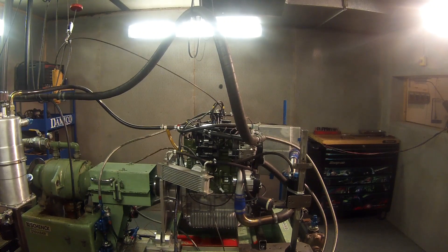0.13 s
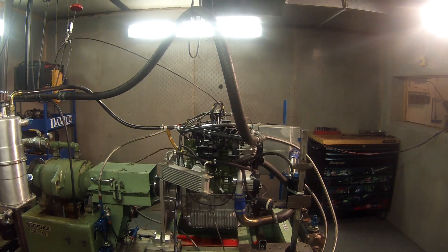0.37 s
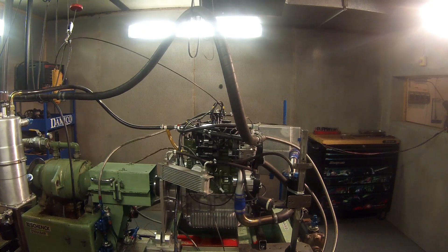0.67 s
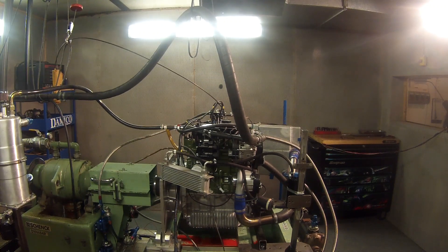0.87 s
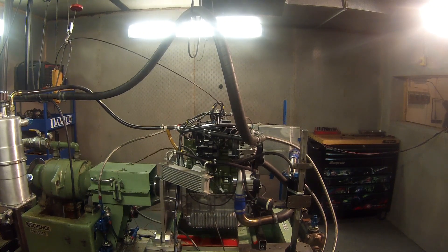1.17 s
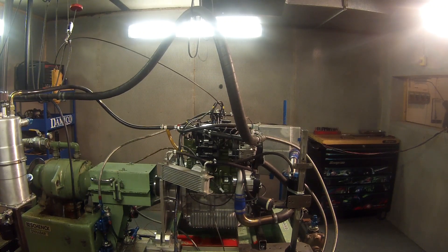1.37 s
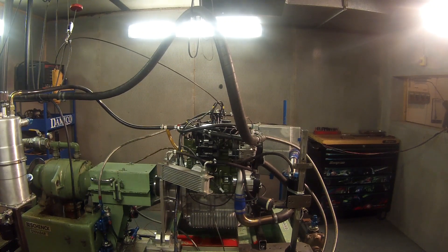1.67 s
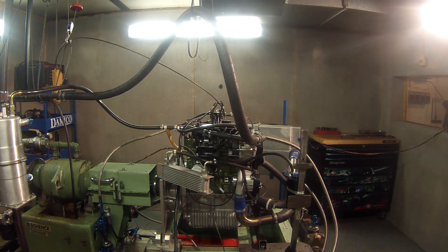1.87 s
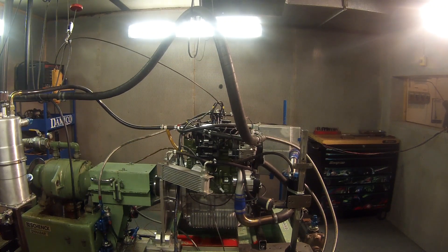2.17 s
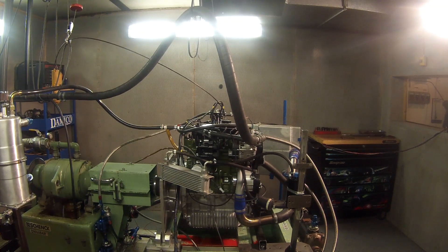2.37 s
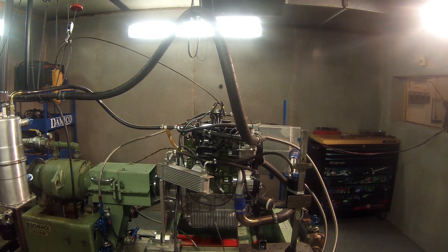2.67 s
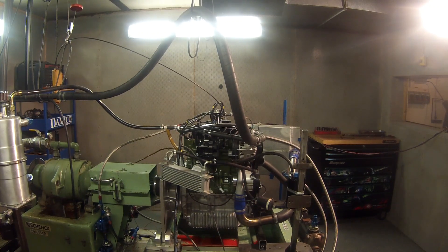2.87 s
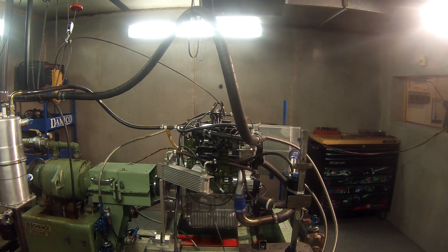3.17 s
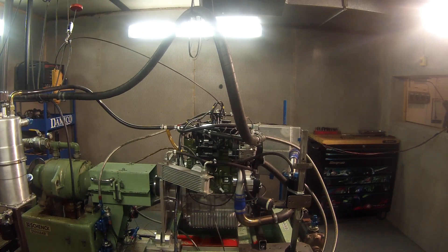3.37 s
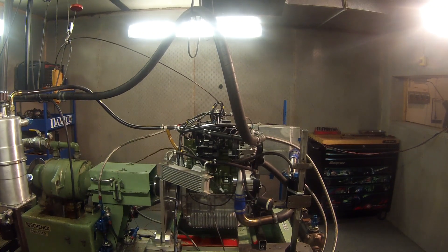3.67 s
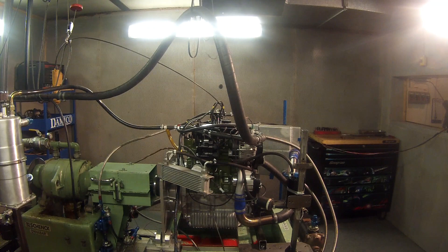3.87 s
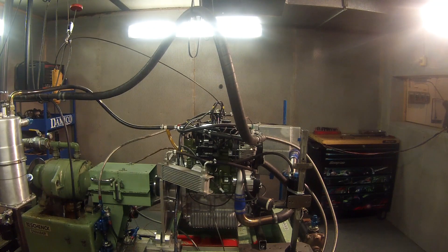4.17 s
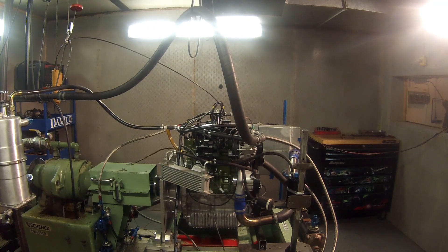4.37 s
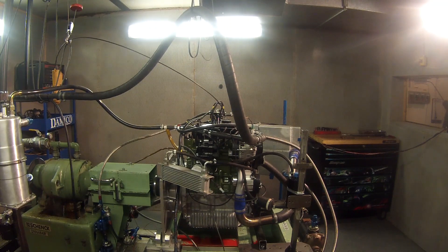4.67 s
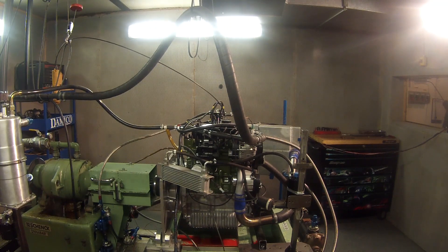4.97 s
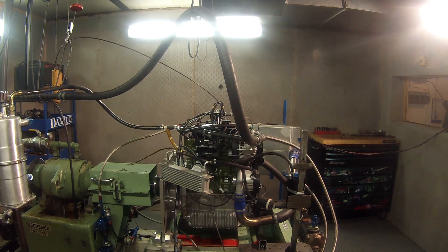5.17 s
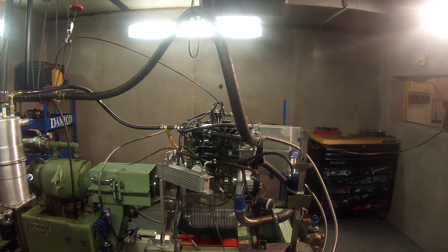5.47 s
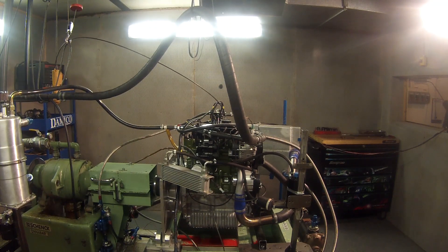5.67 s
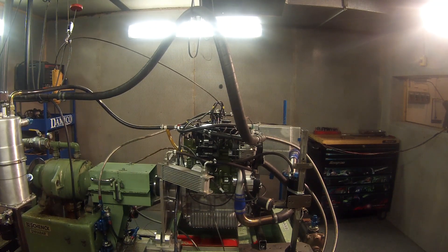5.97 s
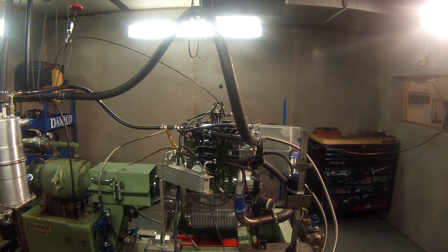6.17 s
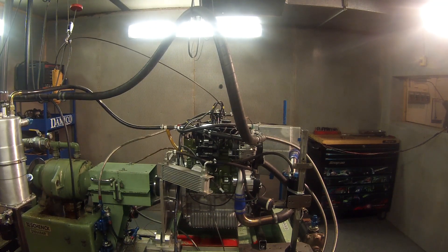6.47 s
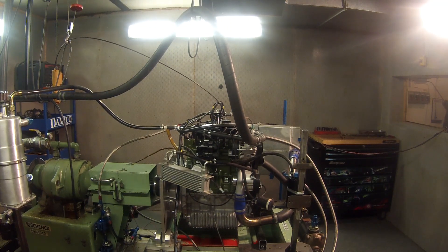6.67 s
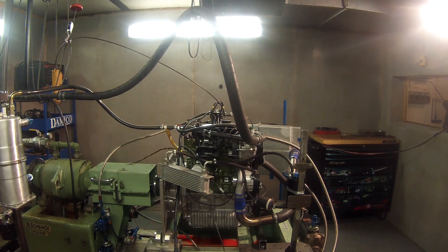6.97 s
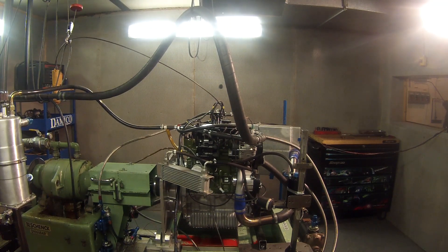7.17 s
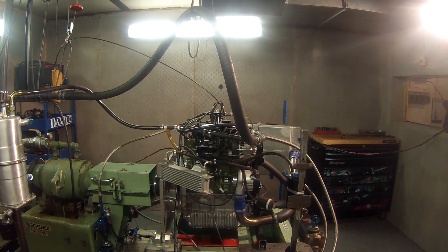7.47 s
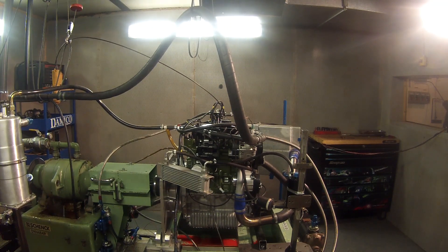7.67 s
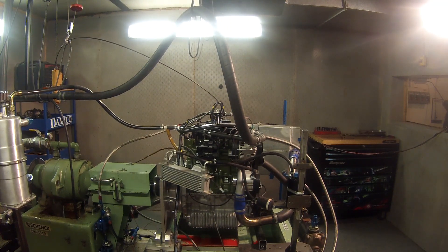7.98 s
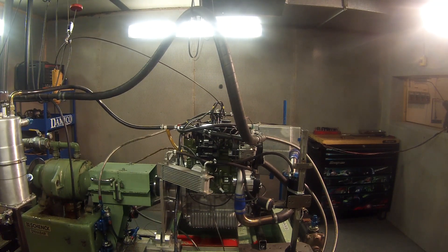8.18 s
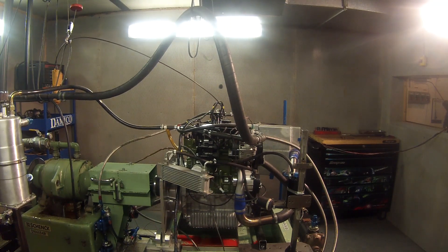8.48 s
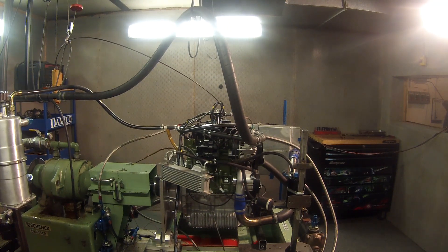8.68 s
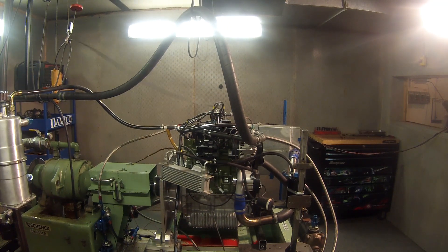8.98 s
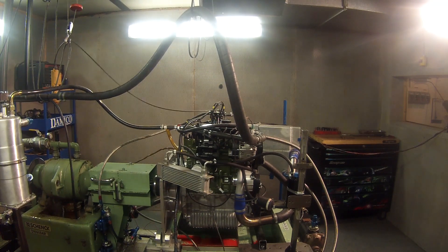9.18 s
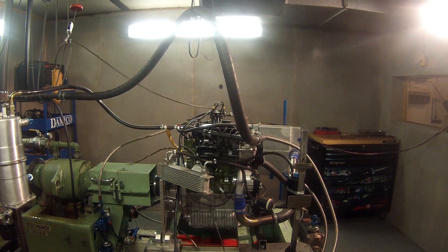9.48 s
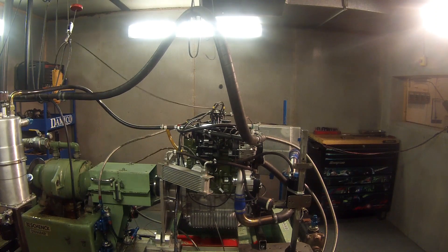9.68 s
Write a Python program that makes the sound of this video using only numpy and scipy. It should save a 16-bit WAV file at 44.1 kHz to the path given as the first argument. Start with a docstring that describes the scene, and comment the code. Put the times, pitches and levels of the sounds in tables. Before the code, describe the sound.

An engine drones and clatters at steady high revs under a thin supercharger whine, then drops off with rapid air chuffs and exhaust burble.

```python
"""Supercharged four-cylinder on a dyno.

The engine is held near 6000 rpm under full load in a small concrete cell. The exhaust drones, the
metal clatters in a pattern that repeats once a cycle, and the supercharger hisses and whines.
Then the throttle shuts: the revs sink, the exhaust burbles and booms, and the blocked compressor
surges in quick chuffs."""
import sys
import numpy as np
from scipy import signal
from scipy.fft import rfft, irfft, next_fast_len
from scipy.io import wavfile
from scipy.ndimage import uniform_filter1d

SR = 44100
rng = np.random.default_rng(int(sys.argv[2]) if len(sys.argv) > 2 else 0)


def wrap_up_sound(samples):
    """Save the sound to the file named by the first command line argument, as 16-bit audio."""
    columns = np.atleast_2d(samples).T
    # keep every value between -1 and 1, then stretch to whole-number steps
    tamed = np.clip(columns, -1, 1)
    steps = np.round(tamed * 32767).astype(np.int16)
    wavfile.write(sys.argv[1], SR, steps)


N = 433923
TIME_S = np.arange(N) / SR
HELD_CYCLE_HZ = 49.865  # four-stroke cycles, two revolutions each
SHUT_S, CLOSING_S = 8.955, 0.18  # throttle

# Gas rumble in the exhaust. Each row: frequency in Hz, relative density in dB.
RUMBLE_SPECTRUM = [(20, -29), (46, -4), (100, -5), (170, -0.5), (210, -2), (320, -20), (420, -18),
                   (700, -14), (1500, -32)]


def exhaust(cycles, waver_db=0.32, lowest_db=-2, lowest_waver_db=4):
    """Loaded exhaust: harmonics of the cycle rate, with one pressure pulse per cylinder."""
    # Exhaust lines. Each row: multiple of the cycle rate, level in dB.
    lines = [(1, -53.5), (2, -48.2), (3, -49.0), (4, -23.3), (5, -51.2), (6, -45.3), (7, -58.0), (8, -36.2),
             (9, -49.8), (10, -44.7), (11, -59.6), (12, -35.1), (13, -52.1), (14, -45.6), (15, -54.8),
             (16, -47.3), (17, -56.4), (18, -36.3), (19, -48.8), (20, -46.3), (21, -62.4), (22, -58.3),
             (23, -47.3), (24, -50.9)]
    drone = 0
    for order, db in lines:
        phase = np.pi if order in (4, 8, 12) else 2 * np.pi * rng.random()  # these align into pulses
        if order == 1:
            db = db + lowest_db + lowest_waver_db * drift(3)
        drone = drone + from_db(db) * np.cos(2 * np.pi * order * cycles + phase)
    return np.sqrt(2) * drone * from_db(waver_db * drift(4.7))


def clatter(cycles, gain_db=0.22, shifting_db=-12.5, shift_hz=4, jitter_s=8e-6):
    """Block, head and valves knock alike each cycle; the pattern shifts while its power holds."""
    # Envelope of the clatter's lines. Each row: frequency in Hz, level in dB.
    envelope = [(1200, -59), (1350, -41.5), (1450, -55), (1600, -46.5), (1800, -42), (2200, -50.5),
                (2800, -45.5), (3250, -41.5), (3700, -39), (4400, -48), (5300, -49), (6200, -53.5),
                (6900, -43.5), (7450, -43.5), (7800, -80), (9000, -60)]
    # Lines that ring out. Each row: multiple of the cycle rate, level in dB.
    ringing = [(30, -39.4), (38, -38.9), (41, -35.3), (42, -35.0), (43, -31.2), (46, -36.2), (47, -35.9),
               (50, -37.0), (53, -39.3), (62, -36.9), (70, -34.0), (71, -31.9), (73, -24.6), (74, -30.5),
               (75, -27.6), (76, -30.1), (78, -34.0), (80, -30.0), (85, -34.0), (86, -35.8), (98, -35.5),
               (99, -35.1), (103, -33.5), (114, -37.2), (115, -35.9), (117, -38.6), (118, -37.4),
               (131, -35.1), (139, -38.5), (148, -39.6)]
    orders = np.arange(25, 181)
    line_db = spectrum_db(envelope, orders * HELD_CYCLE_HZ) + rng.uniform(-4, 4, len(orders))
    for order, db in ringing:
        line_db[orders == order] = db
    cycles = cycles + jitter_s * HELD_CYCLE_HZ * drift(15)
    out = 0
    for band in np.split(np.arange(len(orders)), [32, 64]):  # low, mid, high: a pattern each
        gains = from_db(line_db[band])
        knock = knock_pattern(cycles, orders[band], gains, decay=1.32, passes=3)
        for _ in range(3):
            blend = from_db(shifting_db) * drift(shift_hz)
            knock += blend * knock_pattern(cycles, orders[band], gains, decay=3.3, passes=1)
        running_power = uniform_filter1d(knock ** 2, SR // 10)
        out = out + knock * np.sqrt(np.sum(gains ** 2) / running_power)
    return from_db(gain_db) * out


def knock_pattern(cycles, orders, gains, decay, passes, size=4096):
    """Four knocks with the given line gains, repeated in step with the camshaft."""
    grid = np.arange(size) / size
    pattern = np.exp(2j * np.pi * rng.random(size))
    for _ in range(passes):  # impose the firing rhythm, then the line gains
        pulsed = np.fft.fft(pattern / abs(pattern) * firing_gate(grid, decay))[orders]
        lines = np.zeros(size, complex)
        lines[orders] = gains * pulsed / abs(pulsed)
        pattern = np.fft.ifft(lines) * size
    return np.interp(cycles % 1, grid, np.sqrt(2) * pattern.real)


def rattle(cycles, cycle_hz, unloaded_db=-9, speed_power=2.6):
    """No two firings are alike: each throws noise into the castings."""
    # Casting noise. Each row: frequency in Hz, density in dB.
    spectrum = [(20, -90), (50, -104), (170, -72), (300, -82), (600, -78.5), (1100, -77), (1500, -77.5),
                (2000, -62), (2450, -81), (3200, -66), (4100, -57.5), (5200, -62), (7200, -65.5),
                (9000, -79)]
    # Casting resonances. Each row: centre in Hz, width in Hz, lift in dB.
    modes = [(2295, 72, 13), (3690, 70, 11)]
    drive = from_db(unloaded_db * closure()) * (cycle_hz / HELD_CYCLE_HZ) ** speed_power
    return drive * noise(spectrum, modes) * firing_gate(cycles, decay=0.17)


def hiss(cycles, cycle_hz, gain_db=-1.2, shut_db=-4.5, speed_power=2.5, flutter_db=0.3, flutter_hz=12.2):
    """Compressor air, gulped by the cylinders and fluttering on the edge of surge."""
    # Airflow noise. Each row: frequency in Hz, density in dB.
    spectrum = [(300, -75.5), (1100, -80), (1700, -68), (2400, -69.5), (3100, -67), (3600, -62),
                (6500, -59.5), (7700, -64), (8400, -61), (9100, -65.5), (10700, -62.5), (11800, -74),
                (12500, -69), (14000, -84.5)]
    # Charge pipe resonances. Each row: centre in Hz, width in Hz, lift in dB.
    modes = [(2150, 63, 15.4), (3550, 260, 5.9), (4060, 56, 2), (4870, 49, 7.8), (5520, 83, 3.1),
             (7020, 67, 1), (11100, 320, 1.33)]
    flutter = np.sin(2 * np.pi * flutter_hz * TIME_S + 1.1 * drift(0.74))
    flow_db = gain_db + shut_db * closure() + flutter_db * flutter
    flow = (cycle_hz / HELD_CYCLE_HZ) ** speed_power * from_db(flow_db)
    return noise(spectrum, modes) * firing_gate(cycles, decay=0.17) * flow


def whine(cycle_hz, blades_per_cycle=200.36, level_db=-32.5, flicker_db=2, stall_db_per_s=240):
    """Impeller blade tone: follows the revs, wavers with the belt, fades as the flow stalls."""
    wander_hz = 7 * drift(15.7)
    phase = 2 * np.pi * np.cumsum(blades_per_cycle * cycle_hz + wander_hz) / SR
    db = level_db - stall_db_per_s * since_shut_s(lead_s=0.008) + flicker_db * drift(22)
    return np.sqrt(2) * np.sin(phase) * from_db(db)


def surge(gain_db=0.5, rise_s=0.014, hold_s=0.027, low_t60_s=0.44, high_t60_s=0.16, split_hz=6000):
    """Trapped boost blows back through the compressor in chuffs; their treble dies first in the cell."""
    # Chuffs. Each row: start in seconds, relative level in dB.
    chuffs = [(9.01, 2.5), (9.099, 2), (9.187, 0.5), (9.273, 1), (9.357, .5), (9.438, 0), (9.52, 1.5),
              (9.601, 0), (9.68, -1), (9.756, 0.5)]
    # Backflow noise. Each row: frequency in Hz, density in dB.
    spectrum = [(300, -69.5), (1100, -75), (1600, -62.5), (2500, -61), (3100, -66.5), (3600, -61),
                (6500, -58), (7600, -65), (8300, -60), (9200, -67), (10700, -62.5), (11800, -72),
                (12500, -71), (15000, -74)]
    # Charge pipe ringing. Each row: centre in Hz, width in Hz, lift in dB.
    modes = [(2100, 130, 8), (3720, 150, 11), (4270, 80, 10), (4900, 110, 11), (5830, 90, 8),
             (6450, 100, 7), (8680, 150, 12), (10850, 400, 7.5)]
    air = noise(spectrum, modes)
    low = signal.sosfiltfilt(signal.butter(2, split_hz, fs=SR, output="sos"), air)
    out = 0
    for band, t60_s in ((low, low_t60_s), (air - low, high_t60_s)):
        power = np.zeros(N)
        for start_s, db in chuffs:
            age_s = TIME_S - start_s
            fall_db = 60 * np.maximum(age_s - hold_s, 0) / t60_s
            power += (np.clip(age_s / rise_s, 0, 1) * from_db(db - fall_db)) ** 2
        out = out + band * np.sqrt(power)
    return from_db(gain_db) * out


def overrun(cycles, cycle_hz, first_db=-46, last_db=-27, waver_db=2.5, stumble_s=0.00021):
    """The unloaded exhaust fires unevenly, grows as the revs sink and sweeps through resonances."""
    # Firing harmonics 1-5. Each row: relative level in dB at held speed, at final speed.
    partials = [(1.5, -1.5), (-4, -20), (-16, -28), (-28, -23), (-14, -23)]
    # Standing waves. Each row: centre in Hz, width in Hz, lift in dB (negative: a null).
    standing_waves = [(125, 8, 2), (154, 7, -9), (171, 16, 11.5), (250, 20, 14.5), (397, 38, 15),
                      (505, 30, 8.5)]
    firing_hz = 4 * cycle_hz
    firings = 4 * cycles + firing_hz * stumble_s * drift(9)
    slowed = (HELD_CYCLE_HZ - cycle_hz) / (HELD_CYCLE_HZ - cycle_hz[-1])
    drone_db = first_db + (last_db - first_db) * slowed
    drone = 0
    for k, (held_db, final_db) in enumerate(partials, 1):
        db = drone_db + held_db + (final_db - held_db) * slowed
        db += resonance_db(standing_waves, k * firing_hz) + waver_db * drift(14)
        drone = drone + from_db(db) * np.sin(2 * np.pi * k * firings)
    return np.sqrt(2) * drone * closure()


def afterfire(half_width_s=0.038):
    """Unburnt fuel flares in the exhaust in soft, low puffs."""
    # Puffs. Each row: peak time in seconds, level in dB.
    puffs = [(9.06, -33), (9.565, -27.5)]
    # Resonances they excite. Each row: centre in Hz, width in Hz, lift in dB.
    modes = [(76, 18, 9), (125, 25, 11), (250, 35, 15), (380, 40, 8)]
    envelope = sum(from_db(db) * np.exp(-((TIME_S - peak_s) / half_width_s) ** 2) for peak_s, db in puffs)
    flame = noise(RUMBLE_SPECTRUM, modes)
    return envelope * flame / flame.std()


def boom(mode_hz=46, loaded_db=-66, shut_db=-32, build_s=0.27):
    """The exhaust pipe's lowest mode builds up once the throttle shuts."""
    db = shut_db + (loaded_db - shut_db) * np.exp(-since_shut_s() / build_s)
    phase = 2 * np.pi * mode_hz * TIME_S + 1.6 * drift(3.3)
    return np.sqrt(2) * np.sin(phase) * from_db(db + drift(4))


def burble(loaded_db=-70, shut_db=-38):
    """Gas rumbles in the exhaust once the load is gone."""
    # Pipe and cell resonances. Each row: centre in Hz, width in Hz, lift in dB.
    modes = [(76, 12, 9), (171.3, 16, 13.3), (250, 16, 11), (395, 39, 18), (508, 25, 6), (585, 22, 7)]
    rumble = noise(RUMBLE_SPECTRUM, modes)
    return from_db(loaded_db + (shut_db - loaded_db) * closure()) * rumble / rumble.std()


def cycle_rate_hz(overshoot_hz=0.33, settle_s=0.25, hunt_hz=0.022, coast_per_s=0.555):
    """The revs settle, hunt a little against the brake, then coast down."""
    held_hz = HELD_CYCLE_HZ + overshoot_hz * np.exp(-TIME_S / settle_s) + hunt_hz * drift(3)
    return held_hz * np.exp(-coast_per_s * since_shut_s())


def firing_gate(cycles, decay):
    """Four pulses a cycle, each falling by `decay` nepers; mean square 1."""
    gate = np.exp(-decay * (4 * cycles % 1))
    return gate / np.sqrt(np.mean(gate ** 2))


def since_shut_s(lead_s=0):
    """Time since lead_s before the throttle starts to shut; zero until then."""
    return np.maximum(TIME_S - SHUT_S + lead_s, 0)


def closure():
    """Throttle from 0 (open) to 1 (shut): slow, then fast."""
    return np.minimum(since_shut_s() / CLOSING_S, 1) ** 2


def noise(spectrum, modes):
    """Noise with the given density, lifted at each resonance."""
    size = next_fast_len(N)
    hz = np.maximum(np.arange(size // 2 + 1) * SR / size, 1)
    gain = from_db(spectrum_db(spectrum, hz) + resonance_db(modes, hz))
    return irfft(rfft(rng.standard_normal(size)) * gain)[:N] * np.sqrt(SR / 2)


def spectrum_db(points, hz):
    """A spectrum interpolated over log frequency."""
    point_hz, db = np.transpose(points)
    return np.interp(np.log(hz), np.log(point_hz), db)


def resonance_db(modes, hz):
    """Summed lift of bell-shaped resonances."""
    return sum(db / (1 + (2 * (hz - centre_hz) / width_hz) ** 2) for centre_hz, width_hz, db in modes)


def drift(rate_hz):
    """Smooth random motion, standard deviation 1."""
    hop, warmup = 100, 2000
    pole = np.exp(-2 * np.pi * rate_hz * hop / SR)
    white = rng.standard_normal(N // hop + warmup + 2)
    slow = signal.lfilter([1], [1, -2 * pole, pole * pole], white)[warmup:]
    return np.interp(np.arange(N) / hop, np.arange(len(slow)), slow / slow.std())


def from_db(db):
    """Decibels to gain."""
    return 10 ** (np.asarray(db) / 20)


def scene(engine_follow=0.7, air_follow=0.6, unloaded_db=-42):
    """Speed, effort and throttle drive the mix; the note dies with the load, the metal rattles on."""
    # Engine effort at held speed. Each row: time in seconds, relative level in dB.
    effort = [(0.0, -16.5), (1.04, -17), (2.5, -15), (2.7, -16.5), (3.54, -16), (8.11, -16), (8.18, -15),
              (8.9, -15.5)]
    effort_db = np.interp(TIME_S, *np.transpose(effort))
    effort_db -= effort_db.mean()
    cycle_hz = cycle_rate_hz()
    cycles = np.cumsum(cycle_hz) / SR
    note = from_db(unloaded_db * closure()) * (exhaust(cycles) + clatter(cycles))
    engine = from_db(engine_follow * effort_db) * (note + rattle(cycles, cycle_hz))
    pipe = overrun(cycles, cycle_hz) + burble() + afterfire() + boom()
    supercharger = from_db(air_follow * effort_db) * hiss(cycles, cycle_hz) + surge() + whine(cycle_hz)
    mono = engine + pipe + supercharger
    return np.array([mono, mono])


def record(dry):
    """Steep low-pass on the top treble."""
    cutoff_hz = 15350
    return signal.sosfilt(signal.ellip(12, 0.1, 90, cutoff_hz, fs=SR, output="sos"), dry)


dry = scene()
out = record(dry)
wrap_up_sound(out)
```